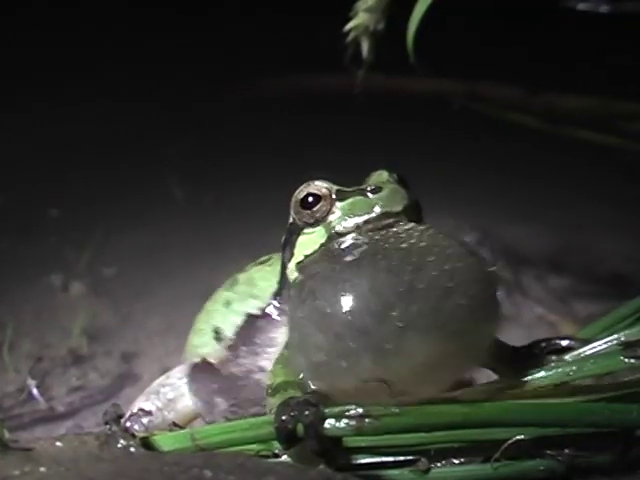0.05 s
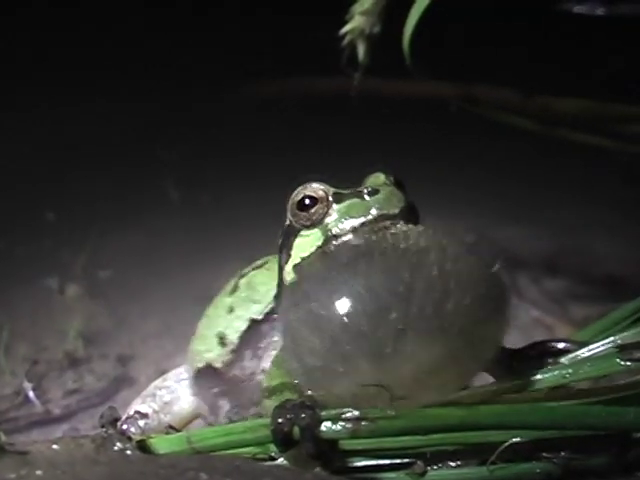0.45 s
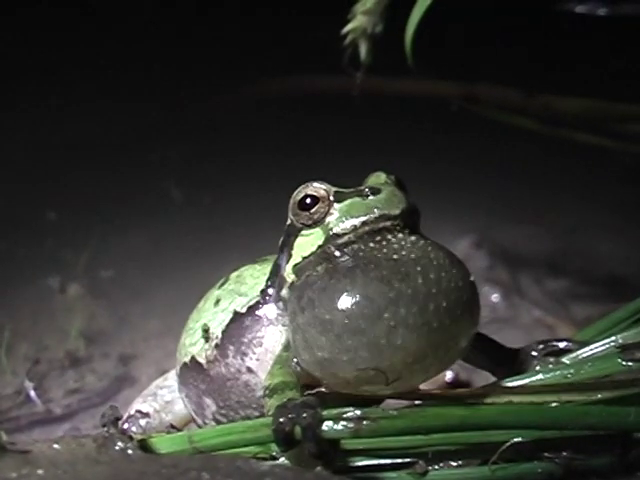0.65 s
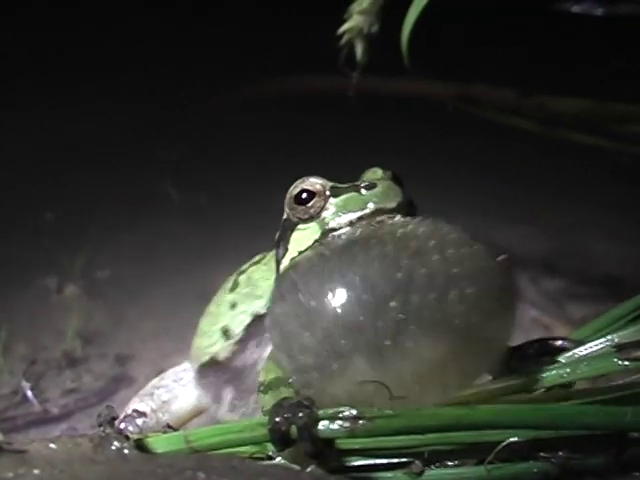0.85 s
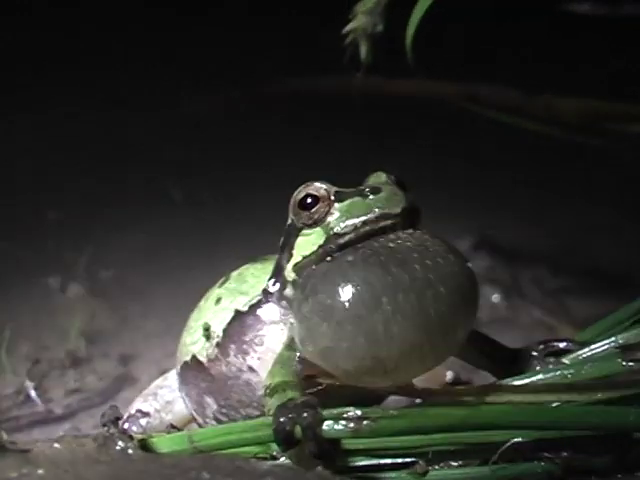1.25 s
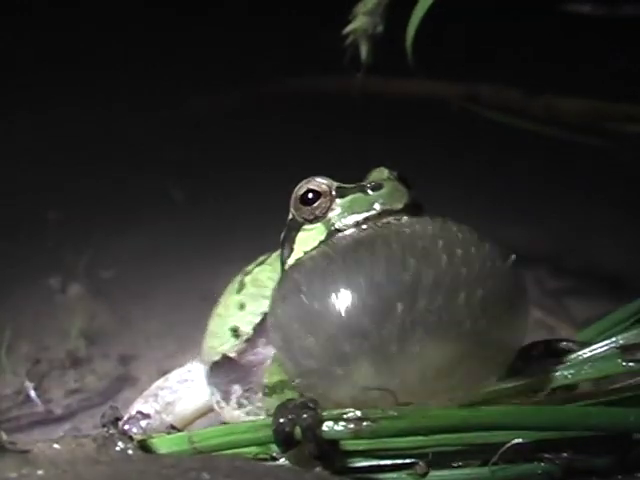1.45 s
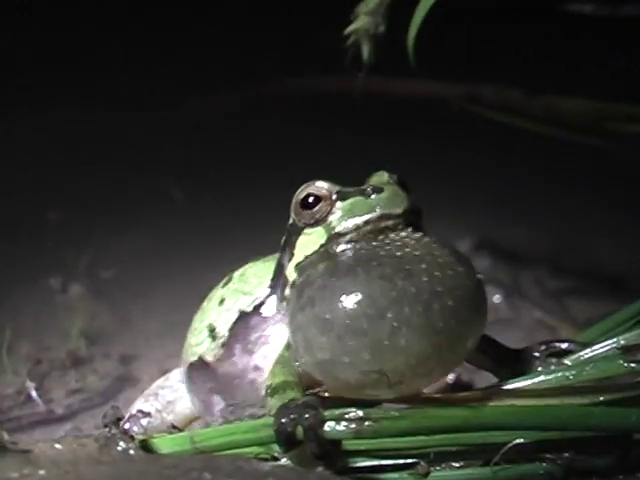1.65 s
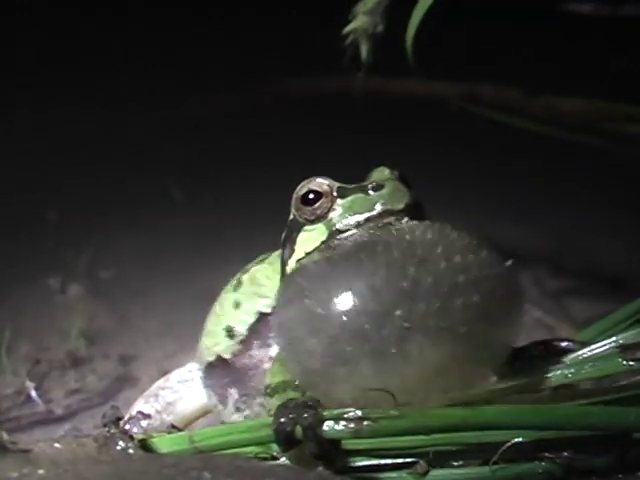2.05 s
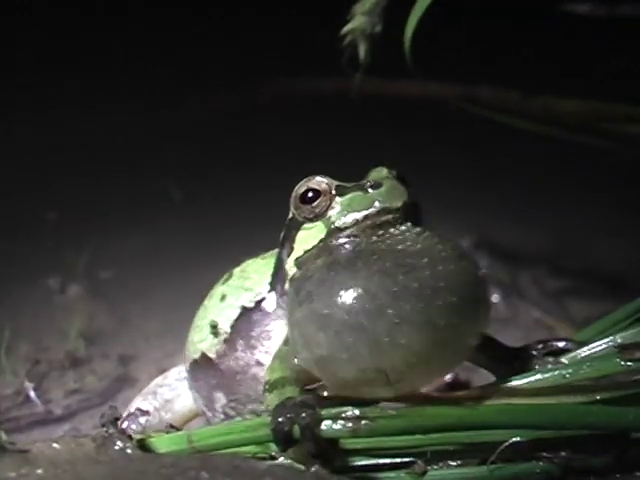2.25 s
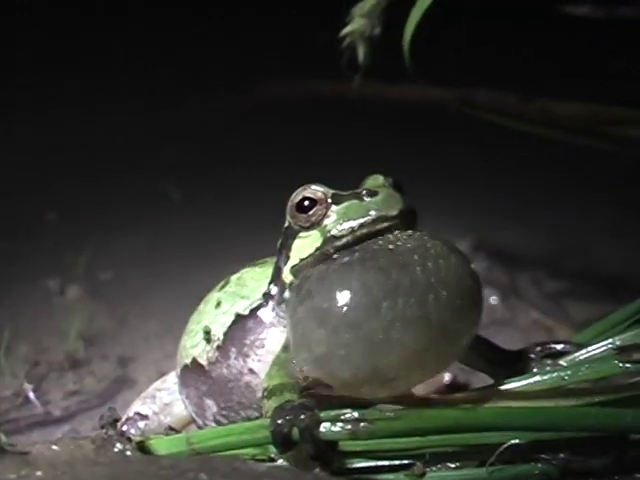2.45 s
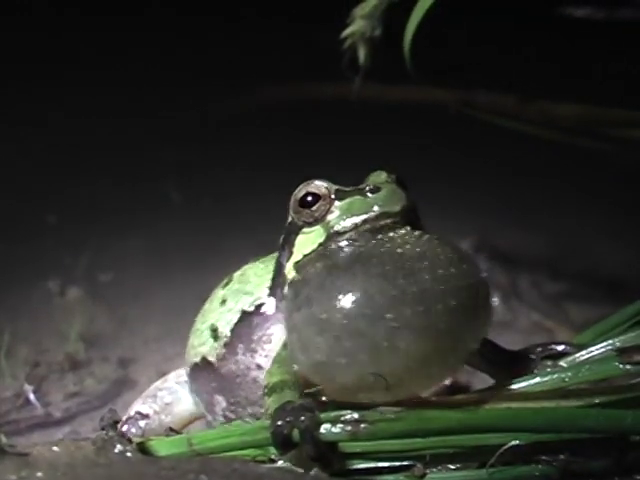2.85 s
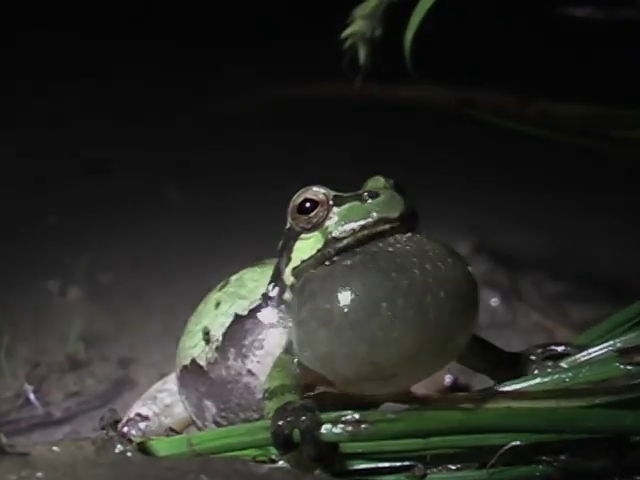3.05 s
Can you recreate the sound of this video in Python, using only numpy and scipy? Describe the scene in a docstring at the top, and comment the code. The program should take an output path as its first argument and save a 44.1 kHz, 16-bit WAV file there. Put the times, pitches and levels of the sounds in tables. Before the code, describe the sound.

Loud, rattling croaks from a close frog repeat quickly, with fainter frogs calling farther away.

```python
"""Tree frogs at night.

A near frog croaks three times a second: a few dry snaps, then a quickening rattle of pulses
ringing two main resonances, which rise as the vocal sac tightens. Its loudest pulses crackle
with microphone overload. Two fainter frogs answer from left and right, over a very quiet
floor with a thin electronic whine."""
import sys
import numpy as np
from scipy import signal
from scipy.fft import rfft, irfft, next_fast_len
from scipy.io import wavfile
from scipy.ndimage import uniform_filter1d, minimum_filter1d

SR = 44100
rng = np.random.default_rng(int(sys.argv[2]) if len(sys.argv) > 2 else 0)


def generate_wav(sig):
    """Save sig (samples, or channels by samples) to the path in sys.argv[1] as 16-bit PCM at SR."""
    pcm = np.round(np.clip(np.atleast_2d(sig).T, -1, 1) * 32767).astype(np.int16)
    wavfile.write(sys.argv[1], SR, pcm)


N = 141120

# Spectra of floor, pulse rasp and overload. Each row: frequency in Hz, relative level in dB.
FLOOR_SPECTRUM = [(25, -10), (150, -5.5), (320, -13.5), (750, -12.5), (1200, 1), (1900, -11), (2750, 4),
                  (3700, -15.5), (5000, -20.5), (12000, -18.5), (15000, -30.5)]
FAR_RASP_SPECTRUM = [(100, -34.5), (700, -21), (1100, -8.5), (2200, 6), (3300, 9), (4200, -24.5),
                     (5400, -26), (6200, -22.5), (7000, -25), (9500, -25), (11200, -25.5), (12200, -43),
                     (15000, -59.5)]
NEAR_RASP_SPECTRUM = [(30, -46), (100, -29), (200, -15.5), (300, -20.5), (860, -21), (1150, 8), (2000, 1.5),
                      (3000, -1.5), (3700, -5), (4600, -31.5), (5500, -19), (7000, -24.5), (9300, -28),
                      (10500, -36), (13000, -46.5), (15500, -53.5)]
OVERLOAD_SPECTRUM = [(30, -21), (100, 9.5), (250, -3.5), (600, 3.5), (2000, 5), (4500, 1), (7000, 4.5),
                     (10000, -10), (13000, -6), (15500, -28.5)]
# Steady hum. Each row: frequency in Hz, RMS level in dB.
HUM_TONES = [(150, -93), (428, -96)]
# Electronic whine. Each row: multiple of WHINE_BASE_HZ, RMS level in dB.
WHINE_HARMONICS = [(3, -97), (4, -98), (5, -97), (6, -97)]
# Ring after a croak. Each row: frequency in Hz, level in dB, T60 in seconds.
AFTER_RING_MODES = [(1250, -27, .028), (1502, -38.5, .075), (2702, -37, .075)]
# Calls. Each row: start in seconds, length in seconds, level in dB, tuning ratio.
LEFT_CROAKS = [(.046, 0.11, -15, 0.95), (.451, 0.11, -14, 0.96), (.752, .112, -22.5, 0.97),
               (2.999, 0.11, -18.5, 0.95)]
RIGHT_CROAKS = [(.165, 0.13, -18, 0.94), (.581, 0.13, -16.5, 0.93), (1.524, 0.13, -24.5, 0.93),
                (1.916, 0.11, -21, 0.93), (2.418, .135, -26.5, 0.94), (2.807, 0.15, -20, 0.95),
                (3.165, 0.19, -17.5, 0.95)]
NEAR_CROAKS = [(0.2907, 0.11, 1, 0.98), (0.7208, 0.11, .5, 0.97), (1.0412, 0.1, 0.45, 0.98),
               (1.343, 0.11, 1, .98), (1.6737, 0.099, 0.7, 1), (1.9688, 0.096, 0.5, .99),
               (2.246, 0.11, 0.5, .99), (2.559, 0.099, 1, 0.98), (2.8442, 0.097, 0.5, 0.99)]
# Course of a call, before tuning. Each row: fraction of its length, pulse gap in seconds,
# upper resonance in Hz, its level in dB, lower resonance in Hz, its level in dB.
LEFT_CONTOUR = [(0, .0067, 2690, -13, 1367, -18.5), (0.202, .006, 2796, -3, 1465, -10),
                (0.548, .0051, 3198, 0, 1454, -6.5), (0.819, .0051, 3182, 0.5, 1560, -5),
                (1.001, .0062, 2946, -16.5, 1430, -10)]
RIGHT_CONTOUR = [(0, .0102, 2630, -13, 1264, -14), (.16, .0083, 2657, 1.5, 1332, -4.5),
                 (.35, .0068, 2837, 6, 1380, -4), (.6, .0066, 2910, 5, 1380, -4.5),
                 (.8, 0.0069, 2936, 7, 1447, 3.5), (1.001, .0064, 2876, 1, 1380, 1)]
NEAR_CONTOUR = [(0, .0083, 2562, -1.5, 1294, -1), (0.081, .0072, 2620, -0.5, 1320, -0.5),
                (0.252, .0061, 2709, -2.5, 1440, -4), (0.54, .0055, 2816, -4.5, 1608, -6),
                (0.731, .0046, 2874, -5.5, 1479, -6.5), (0.869, .0048, 2882, -5.5, 1344, -6),
                (0.941, .0062, 2690, -12, 1378, -9.5), (1, 0.005, 2590, -19.5, 1330, -12.5)]
# Sac modes. Each row: ratio to the resonance, level in dB, rise in seconds, T60 in seconds.
LEFT_UPPER_MODES = [(1.009, -5.5, 0.0013, 0.015), (.9, -8.5, 0.0012, 0.0083), (1.49, -40.5, 0.0011, .007),
                    (1.991, -36.5, 0.0014, .009), (2.39, -42.5, .001, .008), (3.021, -38, .001, .006),
                    (3.5, -44.5, .001, .005)]
RIGHT_UPPER_MODES = [(1.001, -3, .0014, .012), (1.09, -15.5, 0.0015, 0.0087)]
NEAR_UPPER_MODES = [(1.002, -6.5, 0.00068, 0.016), (1.09, -15, 0.00075, 0.006), (2, -42.5, 0.00048, 0.0073),
                    (3.19, -33, 0.0004, 0.0055), (3.38, -37.5, 0.00037, 0.0058)]
COMMON_LOWER_MODES = [(1.002, -6.5, 0.00073, 0.0098), (1.17, -13, 0.0017, 0.0089)]
# Opening snaps, microphone overloads, soft ticks. Each row: start in seconds, level in dB.
SNAP_EVENTS = [(.2772, 0), (.2806, 8), (.7082, 0.5), (.7114, 10), (1.0205, -0.5), (1.025, 4.5), (1.0325, 4),
               (1.328, -9), (1.333, 0), (1.655, 0), (1.6583, 1), (1.6675, 0.5), (1.952, 0.5), (1.9615, 0.5),
               (2.230, -12), (2.234, -0.5), (2.544, -7.5), (2.548, 0.5), (2.827, -12), (2.8312, 1),
               (3.195, -7.5)]
OVERLOAD_EVENTS = [(.2806, -4), (.2912, 3), (.3, -1), (.3072, -3), (.7114, 2), (.7224, 8), (.731, 4),
                   (.7383, -4), (1.0325, -5), (1.0418, 0), (1.05, -4), (1.3443, -2), (1.3527, -10),
                   (1.6675, -9), (1.6756, -4), (1.9688, -9), (2.247, -10), (2.559, -8), (2.5675, -10),
                   (2.8458, -8)]
TICK_EVENTS = [(.951, -35), (.998, -34), (1.235, -37), (1.321, -13), (2.1, -35), (2.158, -23.5),
               (2.222, -13.5), (2.71, -30.5)]
# Slack sac. Each row: frequency in Hz, level in dB, T60 in seconds.
SLACK_SAC_MODES = [(1330, -15.5, 0.0092), (1605, -19, 0.0098), (2160, -15, 0.0087), (2650, -28.5, 0.032)]
# Stereo balance. Each row: frequency in Hz, left minus right in dB.
LEFT_BALANCE = [(200, 2), (1300, 4.5)]
RIGHT_BALANCE = [(200, -7.5), (1300, 0.5), (2500, -4), (4400, -4.5), (9000, -9.5)]
NEAR_BALANCE = [(100, 1.5), (700, 7.5), (1300, 0), (2000, 3.5), (2600, -7), (3300, 4.5), (4400, -4),
                (8000, -5.5), (15000, 9)]
# Stereo phase. Each row: frequency in Hz, left channel's lead in radians.
NEAR_PHASE_LEAD = [(0, -2), (2240, -0.012), (3010, 0.031), (4390, -0.87), (5000, -1), (7410, -0.39),
                   (15300, -0.2)]
# Open-field tail. Each row: frequency in Hz, T60 in seconds.
FIELD_DECAY = [(200, .2), (1300, 0.1), (2800, 0.15), (5000, 0.22), (12000, 0.12)]

FLOOR_DB, WHINE_BASE_HZ = -70.5, 1500
FIRST_RING_S, RING_RISE_S = 0.00076, 0.0011
JITTER_S, LEVEL_SCATTER_DB, TUNE_SCATTER = 0.000025, 0.7, 0.005
RASP_RISE_S, RASP_T60_S = 0.0007, 0.014
SNAP_BOUNCE_S, SNAP_BOUNCE_DB = 0.001792, -1
OVERLOAD_DB, SAC_CUT_HZ = -21, 1090
MUD_DELAY_S, MUD_DB = 0.00158, -18
CEILING_DB, LIMIT_S, TOP_HZ = -10.5, 0.00053, 15500
PULSE_TIME_S = np.arange(1100) / SR
HALF_SIDE = np.array([[0.5], [-0.5]])


def amp(db):
    """Decibels to gain."""
    return 10 ** (np.asarray(db) / 20)


def along(points, hz):
    """Interpolate (Hz, value) points on a log axis."""
    knots_hz, values = np.transpose(points)
    return np.interp(np.log(hz + 1), np.log(knots_hz + 1), values)


def filtered(x, response):
    """Apply a frequency response."""
    size = next_fast_len(N + SR // 2)
    return irfft(rfft(x, size) * response(np.fft.rfftfreq(size, 1 / SR)), size)[..., :N]


def coloured(x, spectrum):
    """Minimum-phase filter, unit power gain."""
    size = 4096
    gain = amp(along(spectrum, np.fft.rfftfreq(size, 1 / SR)))
    cepstrum = irfft(np.log(gain))
    cepstrum[1:size // 2] *= 2
    cepstrum[size // 2 + 1:] = 0
    kernel = irfft(np.exp(rfft(cepstrum)))
    return signal.fftconvolve(x, kernel / np.linalg.norm(kernel))[:N]


def add(track, start_s, sound):
    """Mix a sound in at start_s."""
    i = max(0, int(round(start_s * SR)))
    if i < N:
        track[i:i + len(sound)] += sound[:N - i]


def envelope(rise_s, t60_s):
    """Rise and decay of one pulse."""
    return (1 - np.exp(-PULSE_TIME_S / rise_s)) ** 2 * amp(-60 * PULSE_TIME_S / t60_s)


def ring(hz, db, rise_s, t60_s):
    """One damped resonance."""
    return amp(db) * envelope(rise_s, t60_s) * np.sin(2 * np.pi * hz * PULSE_TIME_S)


def radiated(x):
    """A small sac radiates almost no bass."""
    return signal.sosfilt(signal.butter(10, SAC_CUT_HZ, 'high', fs=SR, output='sos'), x)


def panned(x, balance):
    """Frequency-dependent pan."""
    return filtered(x, lambda hz: amp(along(balance, hz) * HALF_SIDE))


def night_floor():
    """Faint hiss with a blur of distant frogs, low hum, electronic whine."""
    time_s = np.arange(N) / SR
    hiss = np.array([coloured(rng.standard_normal(N), FLOOR_SPECTRUM) for _ in range(2)])
    partials = HUM_TONES + [(multiple * WHINE_BASE_HZ, db) for multiple, db in WHINE_HARMONICS]
    tones = sum(amp(db) * np.sqrt(2) * np.sin(2 * np.pi * hz * time_s) for hz, db in partials)
    return amp(FLOOR_DB) * hiss + tones


def after_ring():
    """Three tones linger at the start and after each near croak."""
    time_s, tones = np.arange(N) / SR, np.zeros(N)
    for onset_s in [FIRST_RING_S] + [start_s + length_s for start_s, length_s, _, _ in NEAR_CROAKS]:
        age_s = np.maximum(time_s - onset_s, 0)
        attack = 1 - np.exp(-age_s / RING_RISE_S)
        for hz, db, t60_s in AFTER_RING_MODES:
            tones += amp(db - 60 * age_s / t60_s) * attack * np.sin(2 * np.pi * hz * age_s)
    return tones


def sac_pulse(modes, hz, db, rise_scale):
    """One pulse rings the modes of one sac resonance."""
    return sum(ring(ratio * hz, db + mode_db, rise_scale * rise_s, t60_s)
               for ratio, mode_db, rise_s, t60_s in modes)


def croaks(calls, contour, upper_modes, rasp, click_db, puff_db):
    """Quickening pulses ring the tightening sac, each with a click and a puff of rasp."""
    tone, puffs, clicks = np.zeros((3, N))
    knots, *columns = np.transpose(contour)
    for start_s, length_s, db, tuning in calls:
        age_s = 0
        for jitter, strength, upper_detune, lower_detune, tilt in rng.standard_normal((32, 5)):
            if age_s > length_s:
                break
            progress = age_s / length_s
            gap_s, upper_hz, upper_db, lower_hz, lower_db = (
                np.interp(progress, knots, column) for column in columns)
            upper_hz *= tuning * (1 + TUNE_SCATTER * upper_detune)
            lower_hz *= tuning * (1 + TUNE_SCATTER * lower_detune)
            upper_db += LEVEL_SCATTER_DB * tilt
            rise_scale = np.interp(progress, [0, 0.12], [0.65, 1])  # first pulses are sharper
            upper = sac_pulse(upper_modes, upper_hz, upper_db, rise_scale)
            lower = sac_pulse(COMMON_LOWER_MODES, lower_hz, lower_db, rise_scale)
            onset_s = start_s + age_s + JITTER_S * jitter * 2 * progress
            gain = amp(db + LEVEL_SCATTER_DB * strength)
            add(tone, onset_s, gain * (upper + lower))
            add(puffs, onset_s, gain * amp(lower_db) * envelope(RASP_RISE_S, RASP_T60_S))
            add(clicks, onset_s + rise_scale * RASP_RISE_S, [gain * amp(lower_db + click_db)])
            age_s += gap_s
    noise = amp(puff_db) * coloured(puffs * rng.standard_normal(N), rasp)
    return radiated(tone) + coloured(clicks, rasp) + noise


def far_frogs():
    """Two fainter frogs, left and right."""
    left = croaks(LEFT_CROAKS, LEFT_CONTOUR, LEFT_UPPER_MODES, FAR_RASP_SPECTRUM,
                  click_db=-10, puff_db=-23)
    right = croaks(RIGHT_CROAKS, RIGHT_CONTOUR, RIGHT_UPPER_MODES, FAR_RASP_SPECTRUM,
                   click_db=-26, puff_db=-31)
    return panned(left, LEFT_BALANCE) + panned(right, RIGHT_BALANCE)


def snaps(events, rasp_db, rise_s):
    """Double clicks ring the slack sac, with a puff of rasp."""
    tone, puffs = np.zeros((2, N))
    for start_s, db in events:
        bounce_s = SNAP_BOUNCE_S * (1 + 0.15 * rng.standard_normal())
        for delay_s, hit_db in [(0, db), (bounce_s, db + SNAP_BOUNCE_DB)]:
            for hz, mode_db, t60_s in SLACK_SAC_MODES:
                tuning = 1 + 0.025 * rng.standard_normal()
                add(tone, start_s + delay_s, ring(hz * tuning, hit_db + mode_db, rise_s, t60_s))
        add(puffs, start_s, amp(db) * envelope(rise_s, RASP_T60_S))
    return radiated(tone) + amp(rasp_db) * coloured(puffs * rng.standard_normal(N), NEAR_RASP_SPECTRUM)


def overload_crackle():
    """Microphone overload on the near frog's loudest pulses, as timed noise bursts."""
    bursts = np.zeros(N)
    for start_s, db in OVERLOAD_EVENTS:
        add(bursts, start_s, amp(db + OVERLOAD_DB) * envelope(rise_s=0.00046, t60_s=0.0086))
    return coloured(bursts * rng.standard_normal(N), OVERLOAD_SPECTRUM)


def near_path(hz):
    """Response of a bounce off the mud and the phase lead between microphones."""
    bounce = amp(MUD_DB) * np.exp(-2j * np.pi * hz * MUD_DELAY_S)
    return (1 + bounce) * np.exp(1j * along(NEAR_PHASE_LEAD, hz) * HALF_SIDE)


def near_frog():
    """Croaks, snaps and ticks just above the mud, plus microphone overload."""
    voice = croaks(NEAR_CROAKS, NEAR_CONTOUR, NEAR_UPPER_MODES, NEAR_RASP_SPECTRUM,
                   click_db=-12.5, puff_db=-23)
    voice += snaps(SNAP_EVENTS, rasp_db=-25.5, rise_s=0.00038)
    voice += snaps(TICK_EVENTS, rasp_db=-32.5, rise_s=0.00051)
    voice += after_ring()
    overload = overload_crackle() + HALF_SIDE * overload_crackle()  # independent mid and side
    return filtered(panned(voice, NEAR_BALANCE), near_path) + overload


def outdoors(x, early_db, field_db, early_t60_s=0.04):
    """Quick scatter from mud and stems, plus a faint open-field tail."""
    hz, frame_s, noise = signal.stft(rng.standard_normal((2, SR // 2)), SR, nperseg=256)
    decay = amp(-60 * frame_s / along(FIELD_DECAY, hz)[:, None])
    tail = signal.istft(noise * decay, SR, nperseg=256)[1]
    time_s = np.arange(tail.shape[1]) / SR
    early = rng.standard_normal(tail.shape) * amp(-60 * time_s / early_t60_s)
    echo = amp(field_db) * tail / np.linalg.norm(tail[0])
    echo += amp(early_db) * early / np.linalg.norm(early[0])
    delayed = np.pad(echo, ((0, 0), (60, 0)))
    return x + signal.fftconvolve(x, delayed, axes=1)[:, :N]


def scene():
    """Three frogs in the open, over the night floor."""
    far, near = far_frogs(), near_frog()
    frogs = outdoors(near, early_db=-21, field_db=-17.5) + outdoors(far, early_db=-2, field_db=-6)
    return frogs + night_floor()


def record(dry):
    """Fast peak limiter, then a brick-wall low-pass."""
    window = int(LIMIT_S * SR)
    peak = np.abs(dry).max(axis=0)
    needed = np.minimum(1, amp(CEILING_DB) / (peak + 1e-9))
    gain = uniform_filter1d(minimum_filter1d(needed, window), window)
    return filtered(dry * gain, lambda hz: hz < TOP_HZ)


dry = scene()
out = record(dry)
generate_wav(out)
```